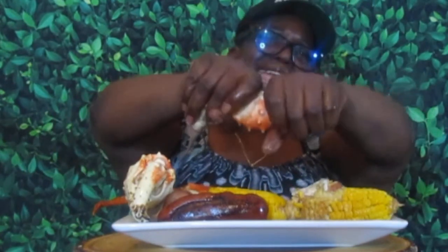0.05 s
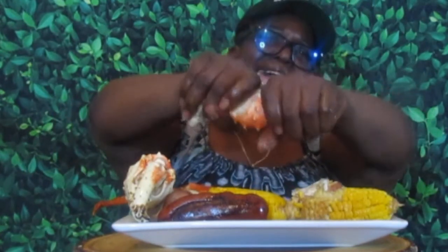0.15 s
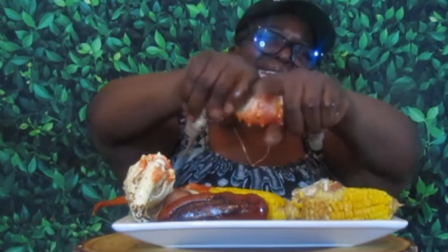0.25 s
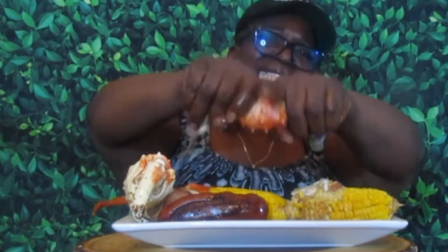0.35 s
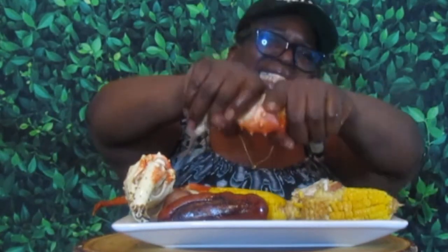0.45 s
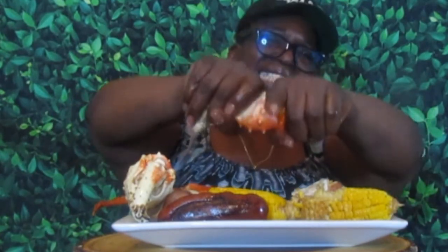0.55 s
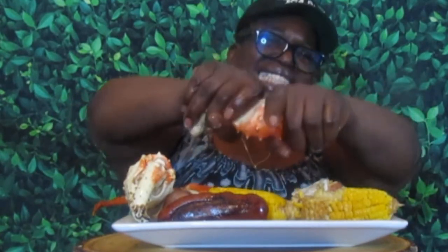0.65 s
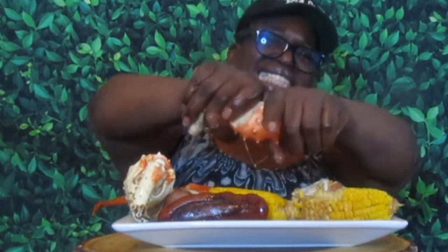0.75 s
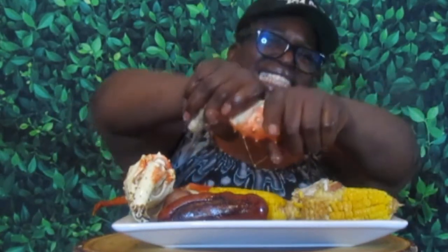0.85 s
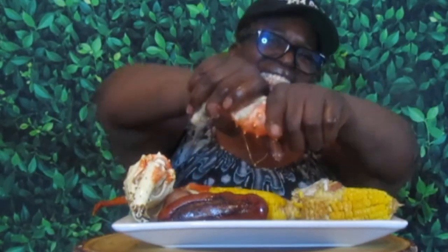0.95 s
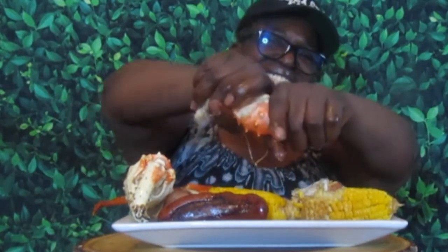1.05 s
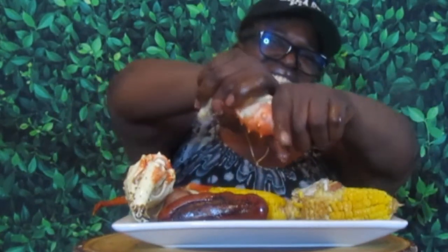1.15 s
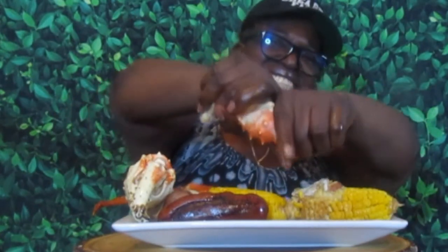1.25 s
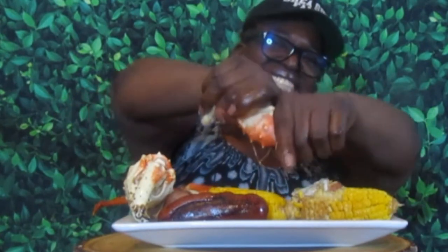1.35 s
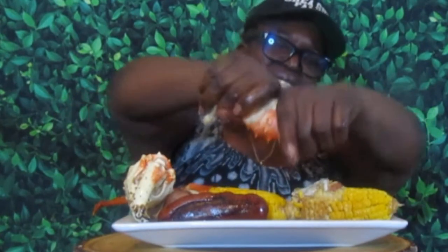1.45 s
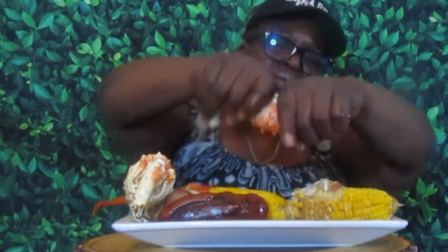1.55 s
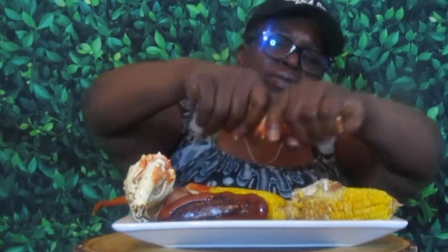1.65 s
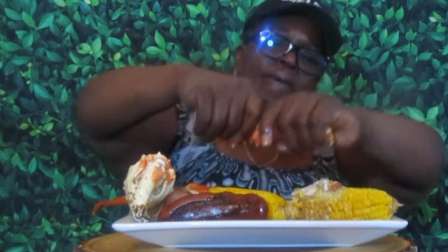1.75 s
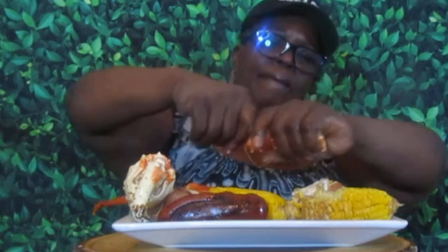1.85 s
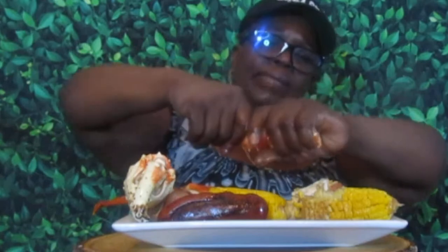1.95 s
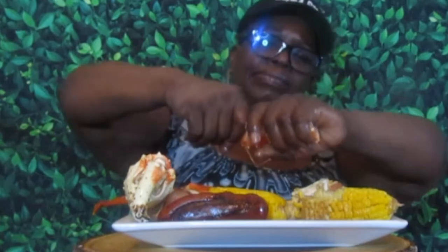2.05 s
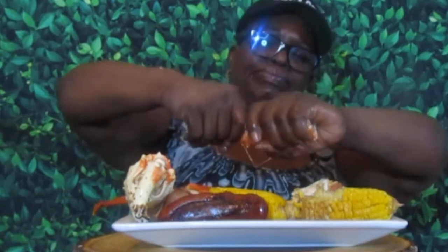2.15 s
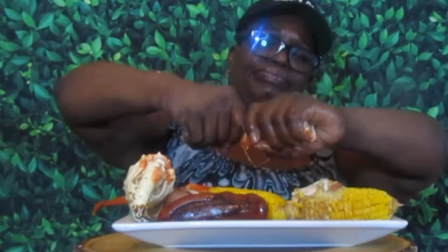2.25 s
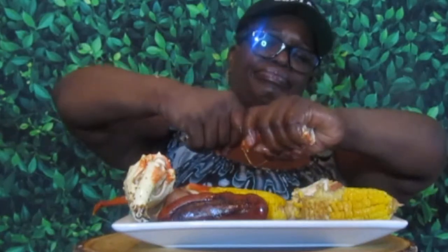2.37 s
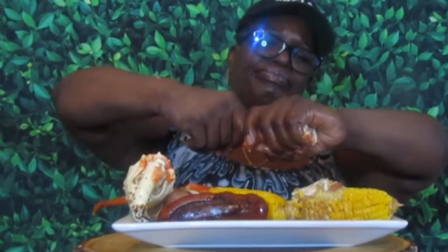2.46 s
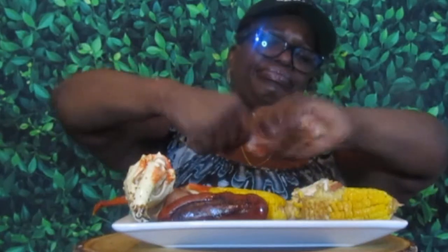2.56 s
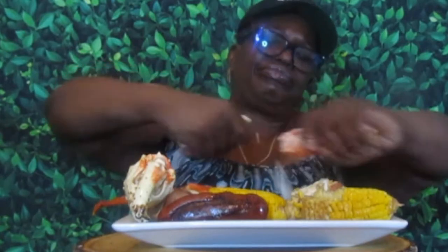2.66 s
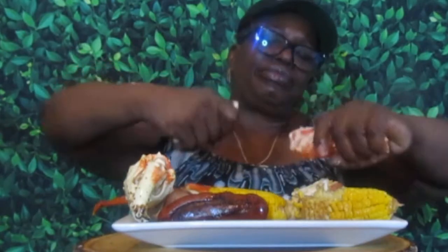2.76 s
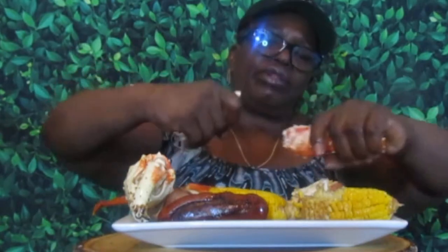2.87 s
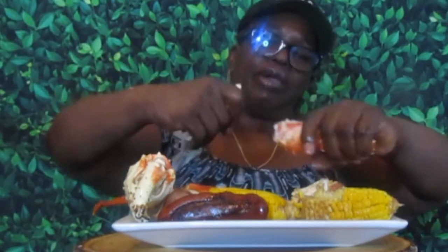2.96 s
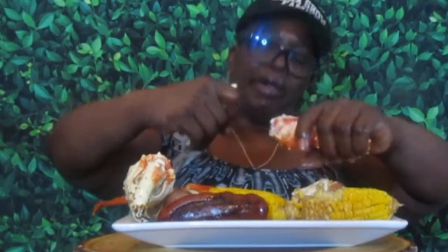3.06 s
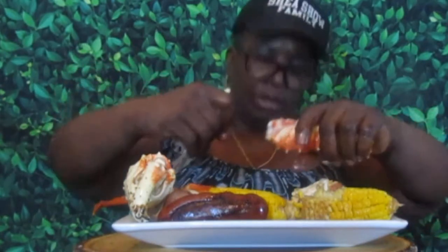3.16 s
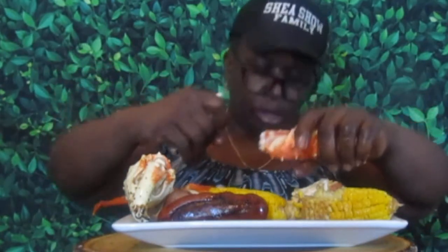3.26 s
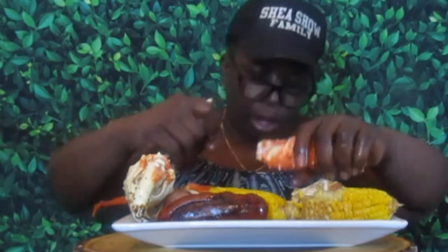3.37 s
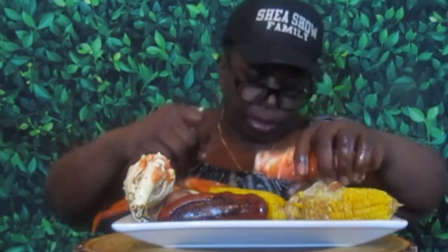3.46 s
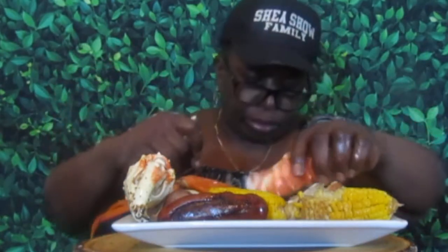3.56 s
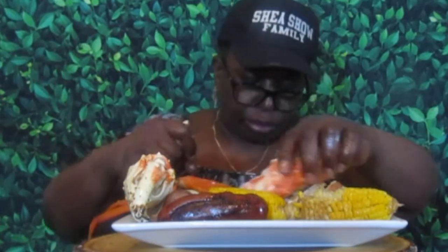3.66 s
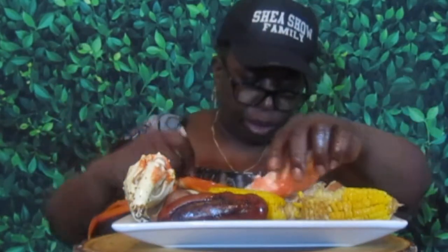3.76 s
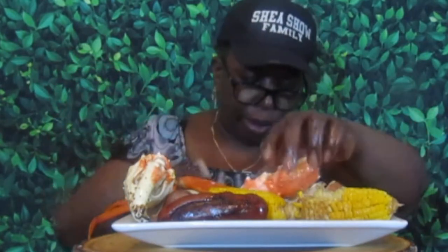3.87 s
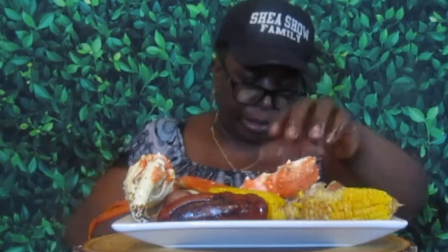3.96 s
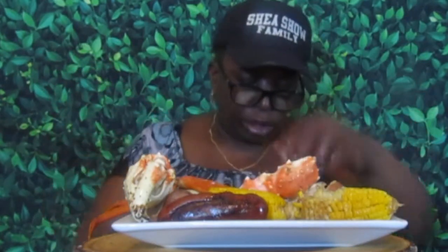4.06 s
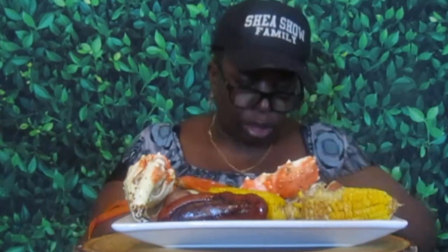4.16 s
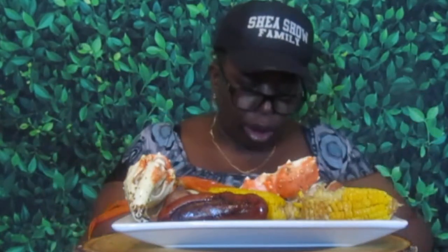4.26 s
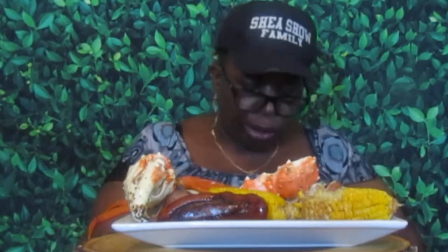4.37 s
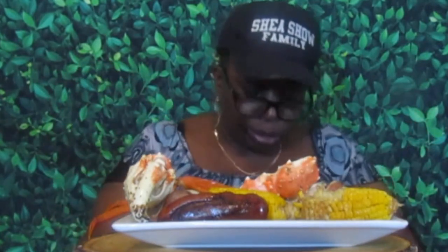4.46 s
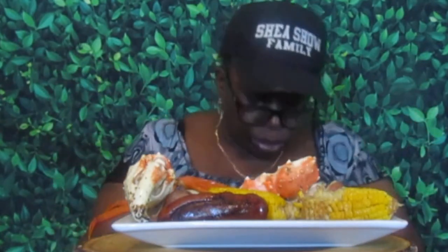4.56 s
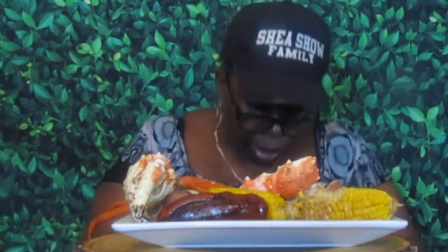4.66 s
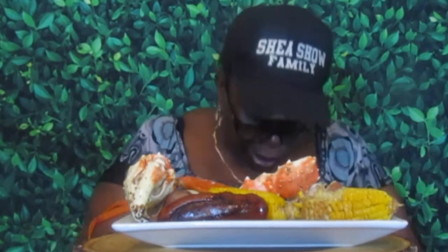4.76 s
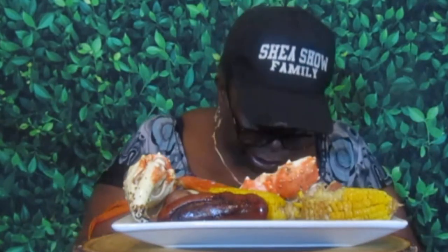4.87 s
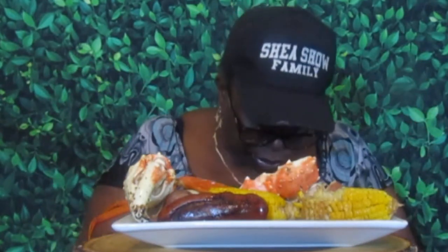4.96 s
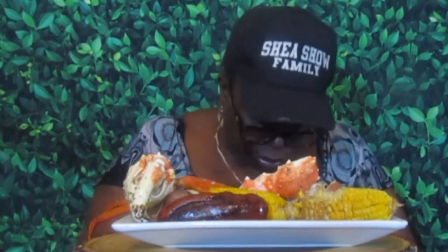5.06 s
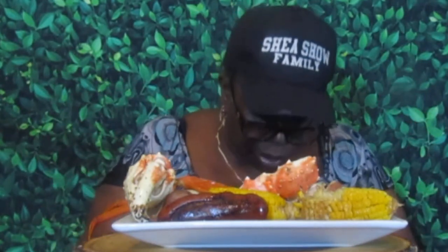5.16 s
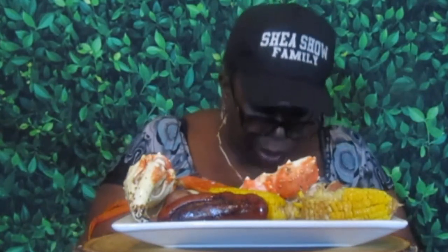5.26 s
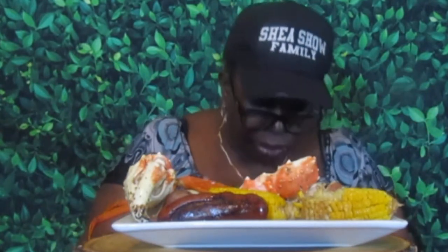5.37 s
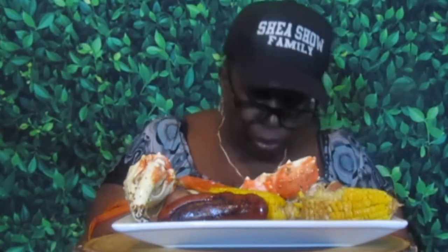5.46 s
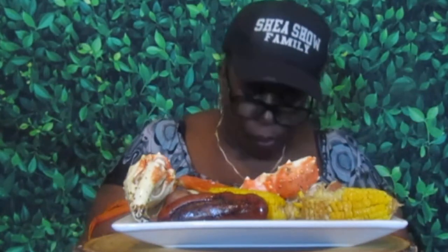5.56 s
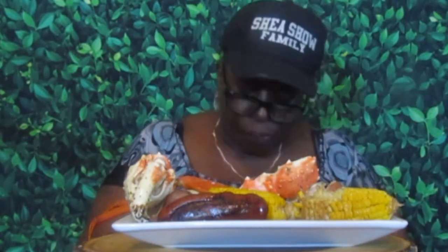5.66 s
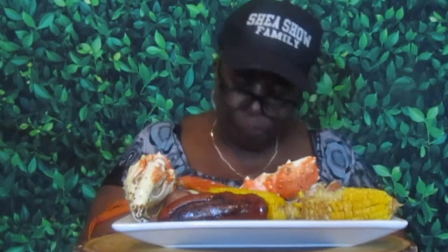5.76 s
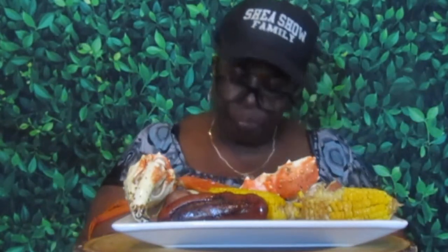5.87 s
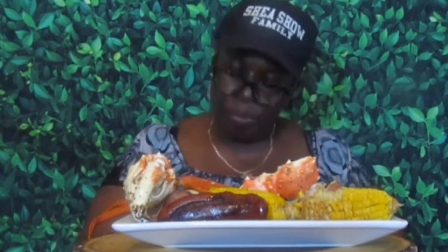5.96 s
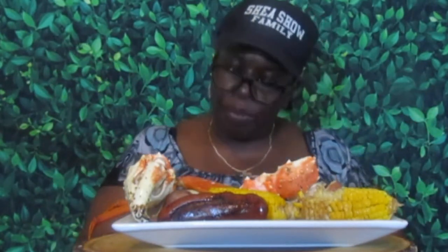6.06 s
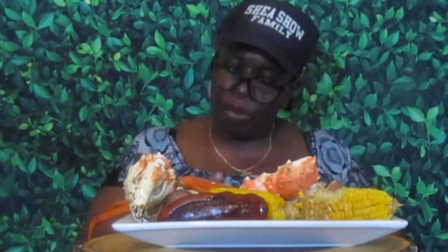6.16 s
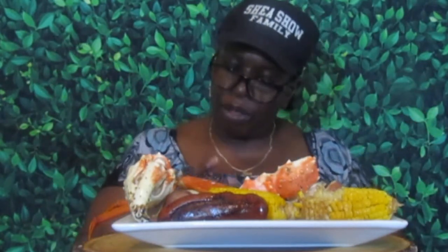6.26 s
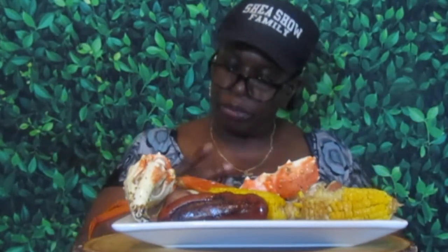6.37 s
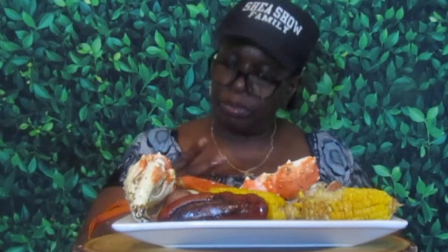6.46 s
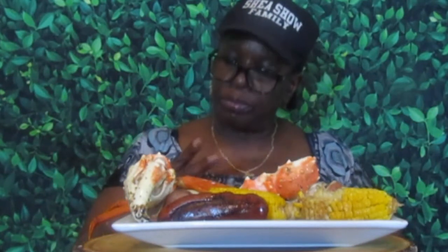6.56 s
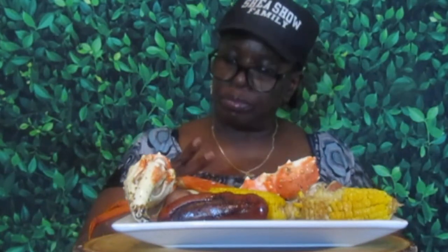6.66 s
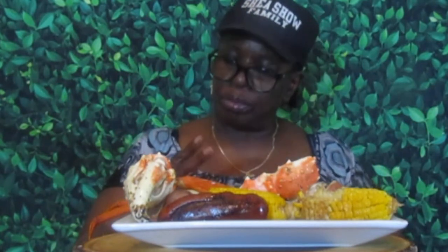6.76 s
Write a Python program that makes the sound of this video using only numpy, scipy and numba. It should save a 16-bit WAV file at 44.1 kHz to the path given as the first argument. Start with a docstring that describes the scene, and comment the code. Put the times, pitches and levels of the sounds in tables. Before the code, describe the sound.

Faint mechanical double ticks and room hiss open the scene, with sparse brittle clicks from strained shell. Sharp cracks gather quickly into one big woody snap with a short live echo, and the background dips briefly. Then a plate clack, soft sleeve rustles, a deep table knock, small clicks, and a crisp harder tap, picked up by a small microphone at the table.

```python
"""In a small live room, at a table, a crab leg is bent by hand until its shell ticks, splits and snaps.
The piece is set down on a plate, the table takes a dull bump and something hard clicks on it.
Each blow is a brief force that excites damped modes, disperses as bending waves and echoes in the room.
Sleeves and hands brush about as filtered noise, over room air, hiss and a thin whine.
The camera's motor ticks faintly at first; its gain control ducks at the big snap and creeps back up."""
import sys
import numpy as np
from scipy import signal
from scipy.fft import rfft, irfft
from scipy.io import wavfile
from scipy.ndimage import uniform_filter1d
from numba import njit

SR = 44100
rng = np.random.default_rng(int(sys.argv[2]) if len(sys.argv) > 2 else 0)


def to_wav(sig):
    """Store sig (one row per channel, or 1-D mono) as 16-bit WAV at the path in sys.argv[1].

    Samples outside -1..1 are clipped; the rate is SR.
    """
    pcm = np.clip(np.atleast_2d(sig), -1, 1) * 32767
    pcm = np.round(pcm).astype(np.int16)
    wavfile.write(sys.argv[1], SR, pcm.T)  # frames by channels


N = 300762
T = np.arange(N) / SR


def undb(db):
    """Level law: decibels to amplitude gain."""
    return 10 ** (np.asarray(db) / 20)


def unit(x):
    """Energy normalisation: the squares sum to one."""
    return x / np.sqrt(np.sum(x ** 2))


def over_hz(points, hz):
    """Logarithmic frequency scale: interpolate a table of (frequency, value) along it."""
    f, value = np.transpose(points)
    return np.interp(np.log(hz + 1), np.log(f), value)


def cut(x, hz, kind, order=2):
    """Band limitation by a Butterworth filter."""
    return signal.sosfilt(signal.butter(order, np.minimum(hz, SR / 2 - 1), kind, fs=SR, output="sos"), x)


def ring(x, modes):
    """Modal superposition: damped resonances driven together, neighbours in opposite phase."""
    total = 0
    for k, (hz, width, db) in enumerate(modes):
        mode = signal.lfilter(*signal.iirpeak(hz, hz / width, fs=SR), x)
        total = total + (-1) ** k * undb(db) * mode
    return total


def add(track, s, sound):
    """Linear superposition: mix a short sound in at time s."""
    i = max(int(s * SR), 0)
    track[i:i + len(sound)] += sound[:N - i]


def bend(x, lag_ms):
    """Dispersion: bending waves delay f kHz by lag_ms / sqrt(f), less the delay of the highest frequency."""
    khz = np.fft.rfftfreq(len(x), 1 / SR) / 1000
    turns = lag_ms * (2 * np.sqrt(khz) - khz / np.sqrt(khz[-1]))
    return irfft(rfft(x) * np.exp(-2j * np.pi * turns))


def reach(db, lowest_hz, at_db, db_per_octave):
    """Moving mass: the harder a knock, the more of the object moves and the deeper its lowest pitch."""
    return max(lowest_hz * 2 ** ((at_db - db) / db_per_octave), 30)


# reverberation of the room: (frequency [Hz], decay time by 60 dB [s])
ROOM_T60 = [(150, 0.43), (500, 0.18), (1500, 0.34), (4000, 0.33), (7000, 0.28), (14000, 0.23)]


def room(wet_db, build_s=0.001, first_s=.009, echo=0.21, echoes_s=.016):
    """Reverberation: direct sound, four early echoes off table and walls, and a dense decaying tail."""
    t = T[:16384]
    hz = np.fft.rfftfreq(len(t), 1 / SR)
    scatter = rfft(rng.standard_normal(len(t)) * (1 - np.exp(-t / build_s)))
    centres = np.log([f for f, _ in ROOM_T60])
    tail = 0
    # each row of the identity gives one band its overlapping share of the spectrum
    for share, (_, t60) in zip(np.eye(len(centres)), ROOM_T60):
        band = irfft(scatter * np.interp(np.log(hz + 1), centres, share))
        tail = tail + band * np.exp(-np.log(1000) * t / t60)
    tail = unit(tail)
    echo_times = first_s + echoes_s * rng.random(size=4)
    tail[(echo_times * SR).astype(int)] += echo
    return signal.unit_impulse(len(t)) + undb(wet_db) * tail


def blows(events, modes, wet_db, splinters, piece_db, piece_q=2.6, splinter_spread_db=8, beam_db=1.7,
          edge_hz=8000, lag_ms=.2):
    """Impulse excitation: one sharp release and a dying train of tiny ones ring the object into the room."""
    out, t = np.zeros(N), T[:4096]
    for s, db, lowest_hz, edge_db, tear_ms, ring_hz in events:
        kick, size = rng.standard_normal((2, len(t)))
        train = kick * undb(splinter_spread_db * size) * np.exp(-1000 * t / tear_ms)
        # a long tear spends more of its energy in the splinters
        force = splinters * np.sqrt(tear_ms / 10) * unit(train)
        force[0] += 1
        sound = ring(bend(force, lag_ms), modes)
        # the piece that gives way favours one ring, and a small piece radiates no lows
        piece = ring(sound, [(ring_hz, ring_hz / piece_q, piece_db)])
        sound = cut(sound + piece, lowest_hz, "high", order=3)
        # the edge level sets the treble above edge_hz: fine splinters sharpen it
        lowpass = signal.butter(3, edge_hz, fs=SR, output="sos")
        dull = signal.sosfiltfilt(lowpass, np.pad(sound, 16))[16:-16]
        sound = undb(db) * unit(dull + undb(edge_db) * (sound - dull))
        # a clean snap beams at the microphone; a long tear radiates all round
        spread_db = beam_db * np.log2(min(tear_ms / 2, 2))
        # the hands move, so every blow finds its own echoes
        add(out, s, signal.fftconvolve(sound, room(wet_db + spread_db)))
    return out


# spectrum of room air and microphone hiss: (frequency [Hz], relative density [dB per Hz])
AIR = [(15, -42), (25, -7), (103, -1), (404, -3), (450, -5), (811, -7), (1030, -8.5), (1180, -8),
       (1720, -13), (2240, -15), (5880, -21), (6900, -19.5), (7890, -25), (11500, -24), (15000, -38)]
AIR_DB = -57.5  # RMS level of the whole spectrum


def air(whine_hz=11810, whine_width_hz=90, whine_db=-81):
    """Stationary noise: shaped room noise and hiss, with a narrow resonance as a thin electronic whine."""
    density_db = over_hz(AIR, np.fft.rfftfreq(N, 1 / SR))
    hiss = irfft(rfft(rng.standard_normal(N)) * undb(density_db), N)
    whine = ring(rng.standard_normal(N), [(whine_hz, whine_width_hz, 0)])
    return undb(AIR_DB) * hiss / hiss.std() + undb(whine_db) * whine / whine.std()


# two halves of a motor step: (mean level [dB], lower ring [Hz], upper ring [Hz], mean upper ring level [dB])
MOTOR_TICKS = [(-31.5, 2870, 3770, -1.5), (-29, 2850, 3580, -5.5)]
# nominal times of the two halves in the second step: (first half [s], second half [s])
MOTOR_FIRST_S = (0.0648, 0.0742)
MOTOR_RATE, MOTOR_STEPS = 15, 32  # steps per second, number of steps
MOTOR_JITTER_S, MOTOR_SCATTER_DB = .0013, 1.2  # standard deviations


def motor(width_hz=450, detune=0.018):
    """Periodic impulses: a small motor, likely focusing the lens, double-ticks two modes of its housing."""
    out, push = np.zeros(N), signal.unit_impulse(1024)
    for step in range(MOTOR_STEPS):
        for s, (db, low_hz, high_hz, high_db) in zip(MOTOR_FIRST_S, MOTOR_TICKS):
            late, size, balance, pitch = rng.standard_normal(4)
            tick = 0
            for hz, mode_db in (low_hz, 0), (high_hz, high_db + MOTOR_SCATTER_DB * balance):
                # three passes: the ring swells as it passes through mount and housing
                mode = [(hz * np.exp(detune * pitch), width_hz * hz / low_hz, 0)]
                tick = tick + undb(mode_db) * unit(ring(ring(ring(push, mode), mode), mode))
            when = s + (step - 1) / MOTOR_RATE + MOTOR_JITTER_S * late
            add(out, when, undb(db + MOTOR_SCATTER_DB * size) * unit(tick))
    return out


# resonances of the brushing noise: (frequency [Hz], width [Hz], relative level [dB])
RUSTLE = [(870, 390, 7.5), (2410, 1070, -1), (4610, 1340, -0.5), (6740, 470, -3), (10100, 8300, -14.5)]
# sleeves and hands brush about the table: (start [s], RMS level before the room [dB], length before fading [s])
BRUSHES = [(2.97, -60.5, 0.14), (4.006, -58, 0.17), (4.372, -66, 0.11), (4.56, -62.5, 0.22),
           (5.095, -64.5, 0.32), (5.802, -70, .25), (6.695, -67.5, .1)]
BRUSH_ATTACK_S, BRUSH_RELEASE_S = 0.056, 0.14  # linear rise, time constant of the fade


def handling(grain_db=5):
    """Friction noise: cloth and fingers brush in uneven grains; each stroke swells, holds and fades."""
    grains = np.repeat(undb(grain_db * rng.standard_normal(N // 256 + 1)), 256)[:N]
    rub = ring(rng.standard_normal(N) * grains, RUSTLE)
    strokes = 0
    for s, db, length in BRUSHES:
        swell = np.clip((T - s) / BRUSH_ATTACK_S, 0, 1)
        fade = np.exp(-np.maximum(T - s - length, 0) / BRUSH_RELEASE_S)
        strokes = strokes + undb(db) * swell * fade
    return rub / rub.std() * strokes


# small hard things handled on the table: (time [s], level [dB], contact length [ms], main ring [Hz])
CLICKS = [(4.037, -30.5, 11, 4630), (4.3406, -35, 2.1, 4830), (5.126, -29.5, 12, 3720),
          (5.23, -36, 3, 4170), (5.348, -31, 2, 4100), (5.9255, -34, 3.3, 3060), (6.148, -21.5, 0.7, 4700),
          (6.1724, -11.5, 10, 1860), (6.1753, -10, 1.1, 2850), (6.1757, -9, 0.45, 6400)]
# modes of the small hard things: (frequency [Hz], width [Hz], relative level [dB])
UTENSIL = [(710, 280, 0), (1770, 580, -4), (2780, 450, 3.5), (4480, 1500, -4), (6350, 280, 5),
           (11000, 920, -13)]
CLICK_EDGE_DB = 10.5  # gain above 8 kHz


def utensils():
    """Stiff impact: thin clicks as things are shifted, and a fuller one as something hard lands."""
    clicks = []
    for s, db, ms, hz in CLICKS:
        lowest_hz = reach(db, lowest_hz=2500, at_db=-33, db_per_octave=5.0)
        clicks.append((s, db, lowest_hz, CLICK_EDGE_DB, ms, hz))
    return blows(clicks, UTENSIL, wet_db=-0.5, splinters=0.95, piece_db=24.5, piece_q=6.9)


# dull bumps on the table: (time [s], level [dB], contact length [ms], main ring [Hz])
BUMPS = [(1.903, -26.5, 7.4, 680), (4.4731, -7, 4.4, 560), (4.481, -12.5, 6.1, 232), (5.126, -27, 19, 700),
         (6.112, -30, 12, 650)]
# modes of the table top: (frequency [Hz], width [Hz], relative level [dB])
TABLE = [(60, 60, -8.5), (145, 82, 1.5), (227, 100, 2), (322, 62, 3.5), (520, 133, -1), (880, 254, -7),
         (1290, 460, -14), (2770, 2300, -22.5), (4120, 3400, -24.5)]
BUMP_EDGE_DB = -5  # gain above 8 kHz


def table():
    """Plate vibration under impact: light bumps stay hollow; a heavy one moves the whole top."""
    bumps = []
    for s, db, ms, hz in BUMPS:
        lowest_hz = reach(db, lowest_hz=480, at_db=-29, db_per_octave=5.5)
        bumps.append((s, db, lowest_hz, BUMP_EDGE_DB, ms, hz))
    return blows(bumps, TABLE, wet_db=3.0, splinters=0.52, piece_db=-6.0, piece_q=4.8)


# contacts as the shell is set down on the plate:
# (time [s], level [dB], gain above 8 kHz [dB], contact length [ms], main ring [Hz])
PLATE_CONTACTS = [(3.692, -14.5, -17, 3.6, 1610), (3.7164, -3, 14.5, 1.37, 1370),
                  (3.7174, -8, -5, 0.63, 5900), (3.727, -10, 3, 7.5, 3600)]
# modes of the plate: (frequency [Hz], width [Hz], relative level [dB])
PLATE = [(330, 540, -13), (890, 340, -1.5), (1300, 270, 4), (1780, 203, -1), (2340, 460, -9),
         (3570, 550, -13.5), (3970, 180, -7.5), (6100, 940, -16), (10500, 1400, -35.5)]
# a contact that rings above the plate's body is the shell's own click and carries no lows
PLATE_LOW_HZ, PLATE_BODY_HZ = 120, 4000


def plate(click_low_hz=2520):
    """Modal response to contact: the piece touches the plate, clicks itself, lands and settles."""
    contacts = []
    for s, db, edge_db, ms, hz in PLATE_CONTACTS:
        lowest_hz = PLATE_LOW_HZ if hz < PLATE_BODY_HZ else click_low_hz
        contacts.append((s, db, lowest_hz, edge_db, ms, hz))
    return blows(contacts, PLATE, wet_db=2.5, splinters=2.0, piece_db=-3, piece_q=4.2)


# the shell gives way, in bursts:
# (time [s], level [dB], lowest pitch [Hz], gain above 8 kHz [dB], tear length [ms], main ring [Hz])
CRACKS = [ (2.147, -9.5, 300, 3, 2.5, 6600), (2.148, -14, 250, -3.5, 3, 430),
          (2.266, 3, 1502, -11, 3.6, 4270), (2.2853, -9, 2970, -8, 1.3, 4450),
          (2.326, -7.5, 2020, 0, 8.8, 4500), (2.3497, -2, 280, 6.5, 2.3, 6200),
          (2.359, -14.5, 2000, -1, 4, 10100), (2.462, -2, 350, 5, 2.4, 5400),
          (2.484, -1.5, 300, -10.5, 6, 5500), (2.493, -4, 300, 0.5, 5.8, 1390),
          (2.5005, 11, 220, 4.5, 1.3, 6250), (2.5028, 8.5, 1480, -12.5, 0.73, 5800),
          (2.5103, 16, 402, -7, 1.6, 1224), (2.513, 13.5, 500, 11, 0.55, 6305),
          (2.521, 0.5, 800, -3, 5, 2700), (2.8715, -7, 4250, -7, 0.43, 5930),
          (2.872, -12.5, 2000, -20, 4.1, 3200)]
# the strained shell ticks without parting: (time [s], level [dB], main ring [Hz])
STRAIN_TICKS = [(0.065, -25.5, 10400), (0.168, -28.5, 1810), (0.400, -34, 6600), (0.572, -33, 10400),
                (0.594, -28, 10700), (1.079, -35, 3400), (1.423, -30, 6700), (1.605, -24, 2010),
                (1.719, -25.5, 6500), (2.009, -28.5, 10700), (2.112, -24, 6430), (2.260, -21.5, 10500),
                (2.859, -25, 5470), (3.3127, -33, 10400), (3.677, -28.5, 10700)]
# modes of the shell: (frequency [Hz], width [Hz], relative level [dB])
SHELL = [(464, 260, -5), (777, 245, -5.5), (1029, 230, -3.5), (1385, 350, -1.5), (2240, 630, 0.5),
         (2974, 320, 2), (4100, 1100, -1), (5300, 880, -1), (6295, 530, 2.5), (10950, 1900, -8),
         (14200, 840, -11.5)]
STRAIN_EDGE_DB, STRAIN_TEAR_MS = -0.5, 2.94  # gain above 8 kHz, tear length
STRAIN_LOW_SHARE, STRAIN_LOW_HZ = .45, 2100  # lowest pitch: this share of the ring, but never above this pitch
# fainter ticks for as long as the leg is held; level and pitch are the centres of their spread
GRIP_S, FAINT_TICKS_PER_S, FAINT_TICK_DB, FAINT_TICK_HZ = 3.2, 3.4, -39, 5500


def shell(faint_spread_db=2, faint_spread_octaves=.4):
    """Brittle fracture: the bent leg ticks under the strain, then splits and snaps in bursts."""
    chance = rng.standard_normal((int(GRIP_S * FAINT_TICKS_PER_S), 3))
    faint = []
    for when, size, pitch in chance:
        hz = FAINT_TICK_HZ * 2 ** (faint_spread_octaves * np.tanh(pitch))
        faint.append((GRIP_S * (when % 1), FAINT_TICK_DB + faint_spread_db * size, hz))
    ticks = []
    for s, db, hz in STRAIN_TICKS + faint:
        lowest_hz = min(STRAIN_LOW_SHARE * hz, STRAIN_LOW_HZ)
        ticks.append((s, db, lowest_hz, STRAIN_EDGE_DB, STRAIN_TEAR_MS, hz))
    snaps = blows(CRACKS, SHELL, wet_db=1.4, splinters=1.4, piece_db=7, piece_q=4.97, lag_ms=.8)
    return snaps + blows(ticks, SHELL, wet_db=0.5, splinters=1.3, piece_db=2.5, piece_q=4, lag_ms=.4)


def port(x, dip_hz=7900, dip_width_hz=1500, depth=0.61):
    """Resonant absorption: the microphone's port hollows out a band of the treble."""
    return x - np.clip(depth, 0, 1) * ring(x, [(dip_hz, dip_width_hz, 0)])


def scene():
    """Direct and reverberant fields: the table sounds through the room; the motor is beside the microphone."""
    rustle = signal.fftconvolve(handling(), room(wet_db=-3.5))[:N]
    ticks = signal.fftconvolve(motor(), room(wet_db=-24))[:N]
    at_port = shell() + plate() + table() + utensils() + rustle + ticks
    return (port(at_port) + air())[None]


@njit
def hold(level, fall):
    """Peak holding: jump up with the level, then sink by a fixed ratio each sample."""
    out, e = np.empty(len(level)), 0.
    for i in range(len(level)):
        e = max(level[i], e * fall)
        out[i] = e
    return out


RELEASE_DB_PER_S = 13  # sinking rate of the held level
TOP_HZ = 15000  # low-pass edge


def record(dry, ceiling_db=-17.5, sense_s=0.0022):
    """Dynamic range control: gain falls fast at loud peaks and recovers slowly; the top is cut."""
    k = 1 / (sense_s * SR)
    level = np.sqrt(signal.lfilter([k], [1, k - 1], dry[0] ** 2))
    held = hold(level, float(undb(-RELEASE_DB_PER_S / SR)))
    gain = 1 / np.maximum(held / undb(ceiling_db), 1)
    gain = uniform_filter1d(gain, size=128)
    lowpass = signal.ellip(8, .2, 70, TOP_HZ, fs=SR, output="sos")
    return signal.sosfilt(lowpass, dry * gain)


dry = scene()
out = record(dry)
to_wav(out)
```